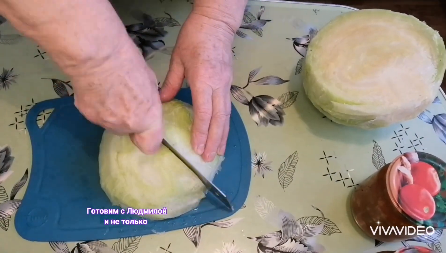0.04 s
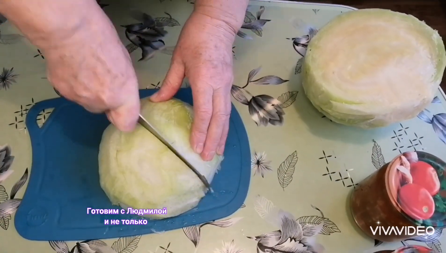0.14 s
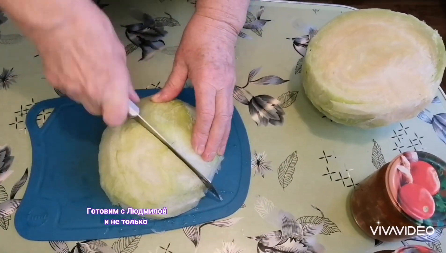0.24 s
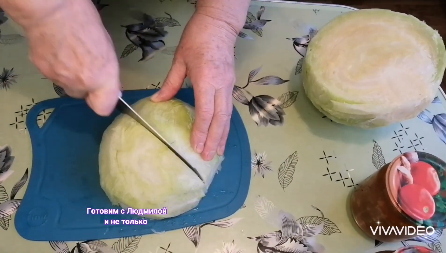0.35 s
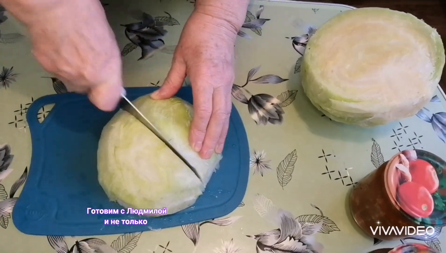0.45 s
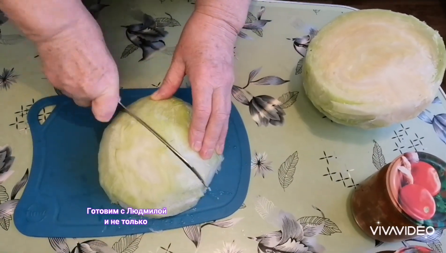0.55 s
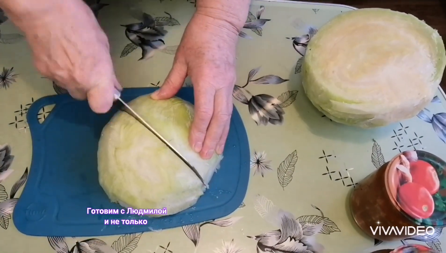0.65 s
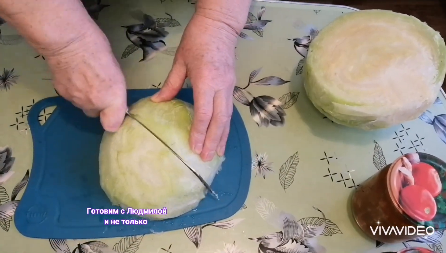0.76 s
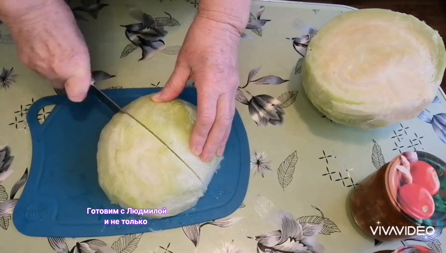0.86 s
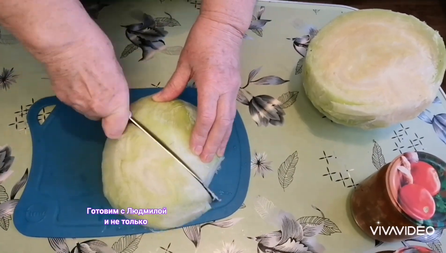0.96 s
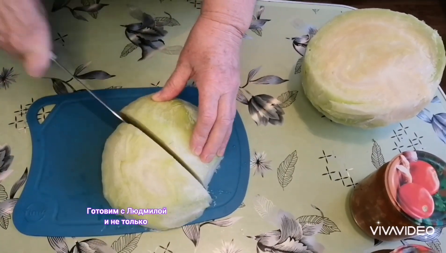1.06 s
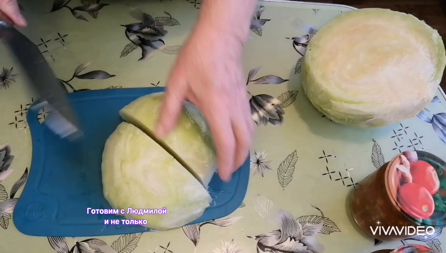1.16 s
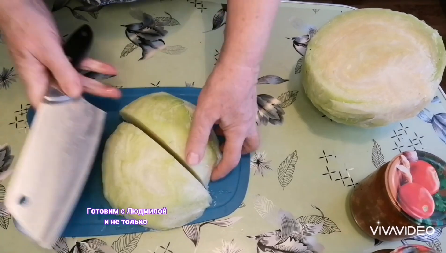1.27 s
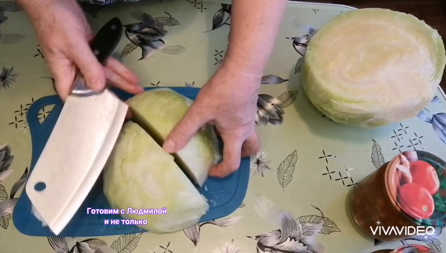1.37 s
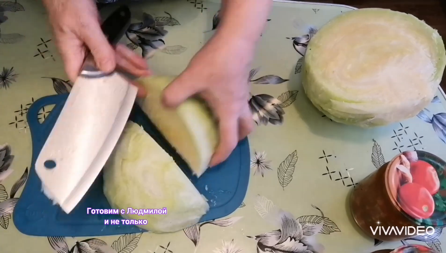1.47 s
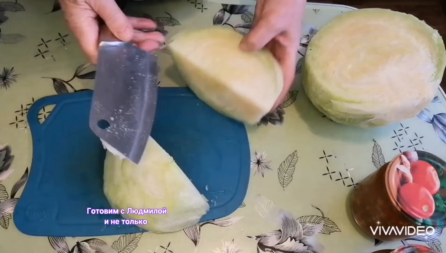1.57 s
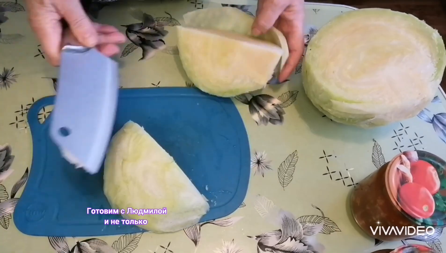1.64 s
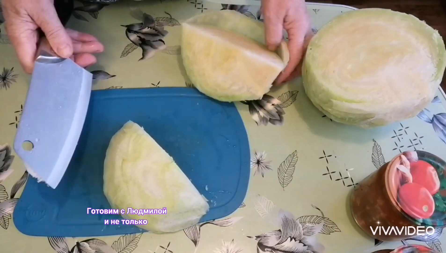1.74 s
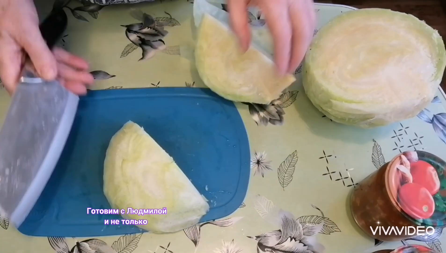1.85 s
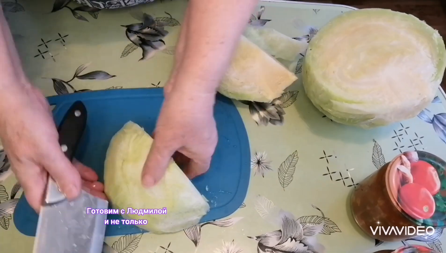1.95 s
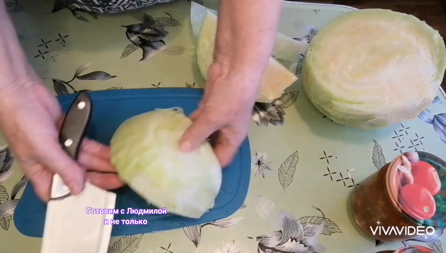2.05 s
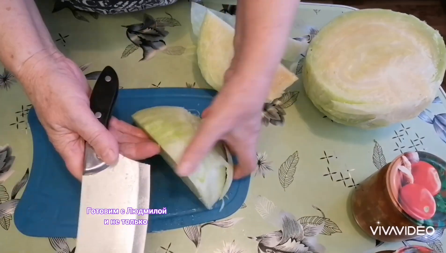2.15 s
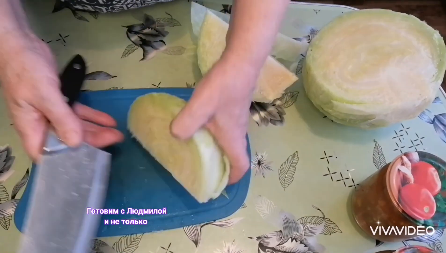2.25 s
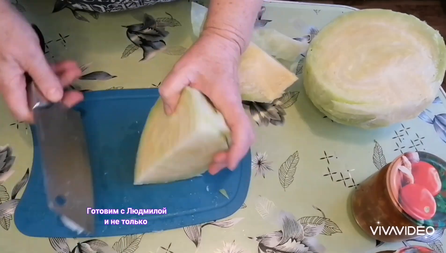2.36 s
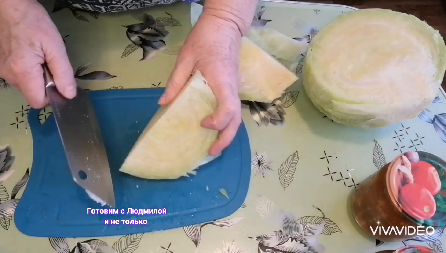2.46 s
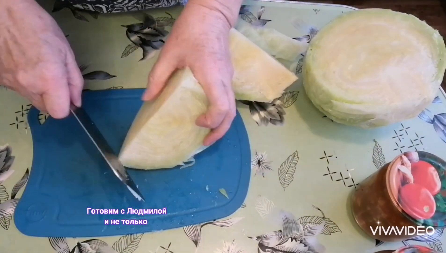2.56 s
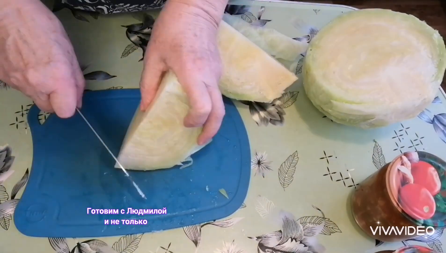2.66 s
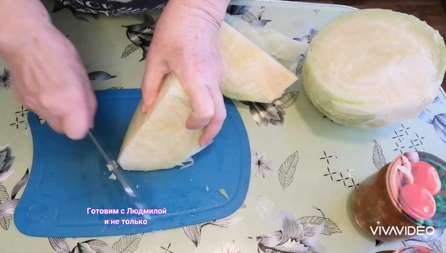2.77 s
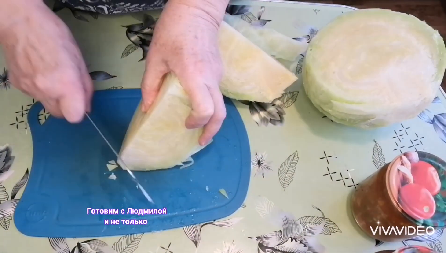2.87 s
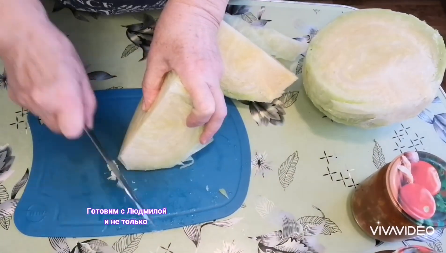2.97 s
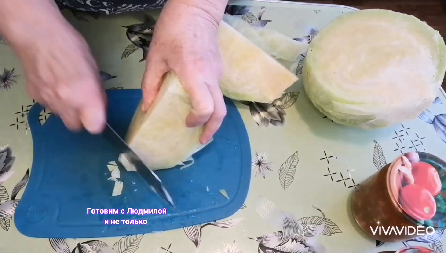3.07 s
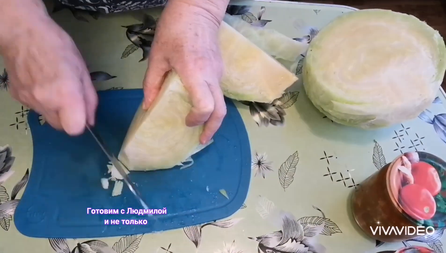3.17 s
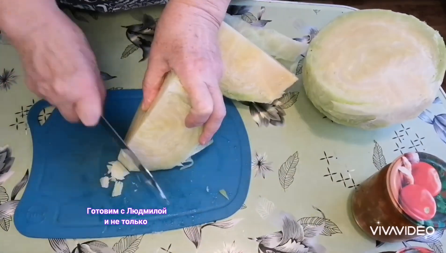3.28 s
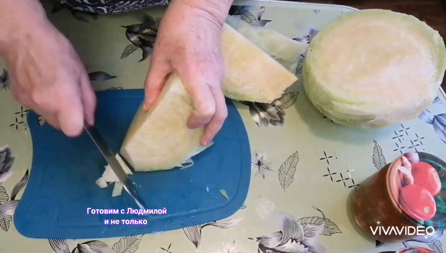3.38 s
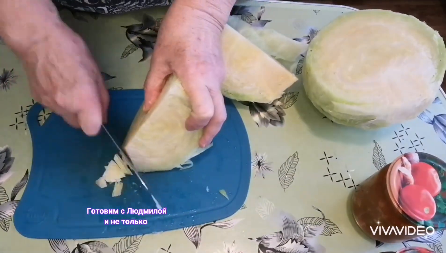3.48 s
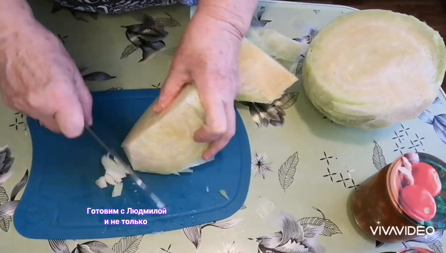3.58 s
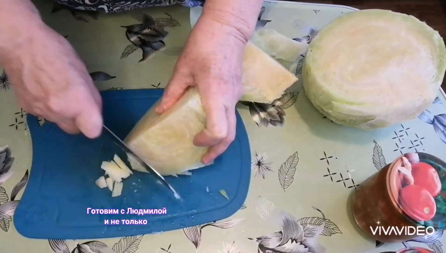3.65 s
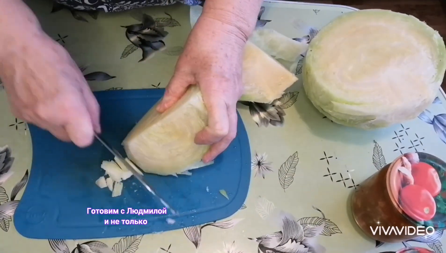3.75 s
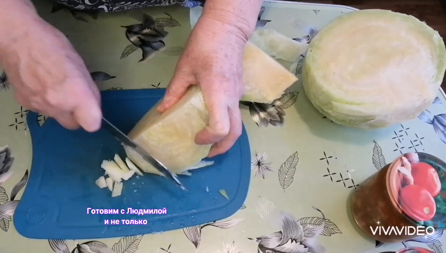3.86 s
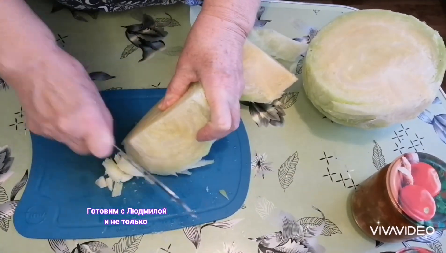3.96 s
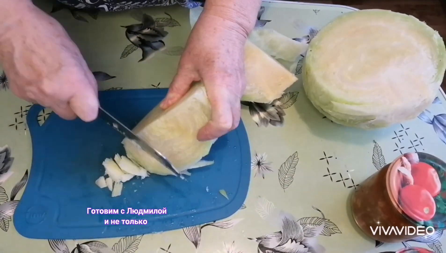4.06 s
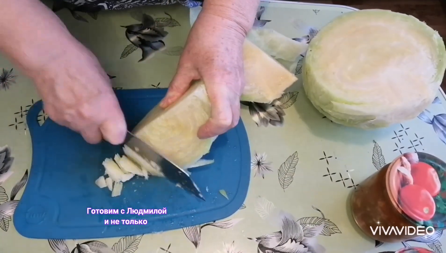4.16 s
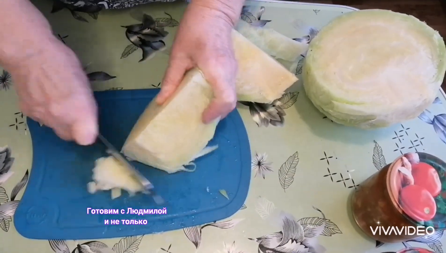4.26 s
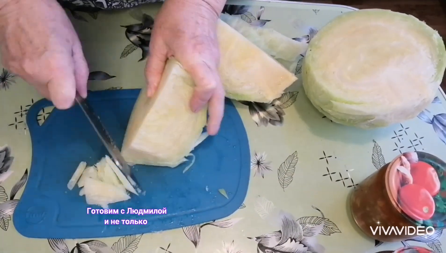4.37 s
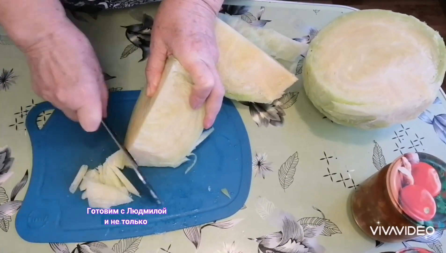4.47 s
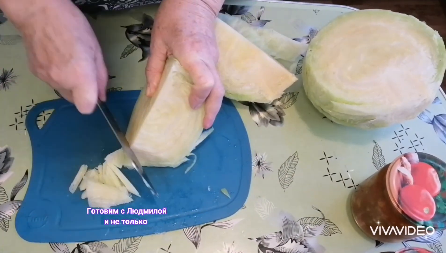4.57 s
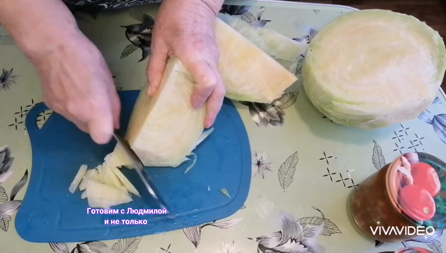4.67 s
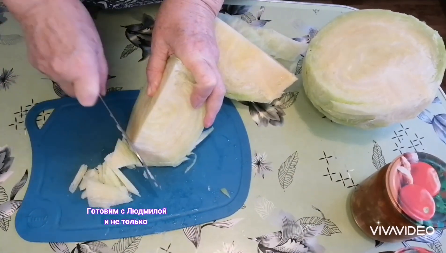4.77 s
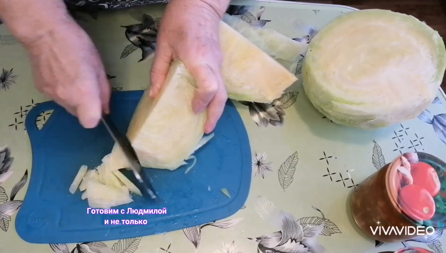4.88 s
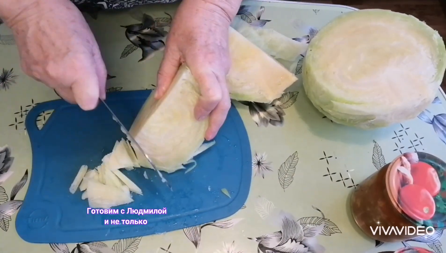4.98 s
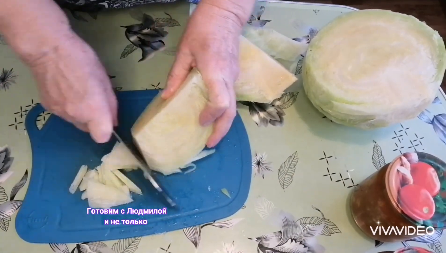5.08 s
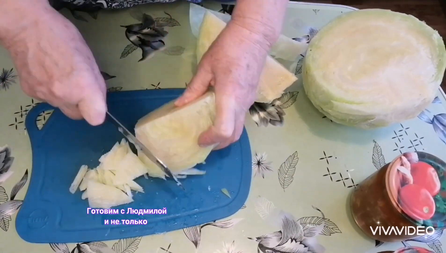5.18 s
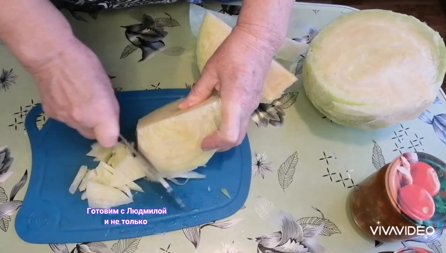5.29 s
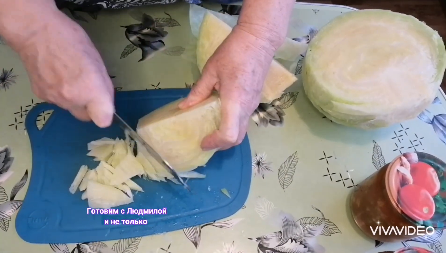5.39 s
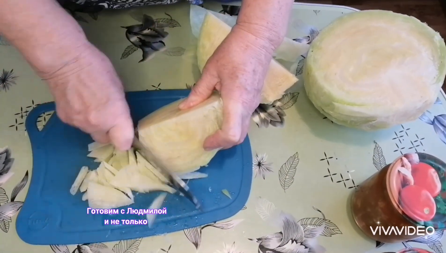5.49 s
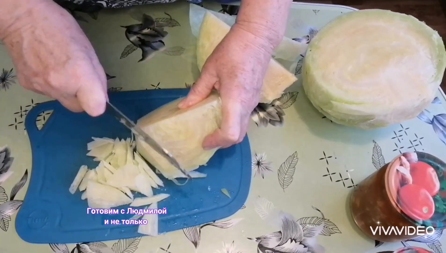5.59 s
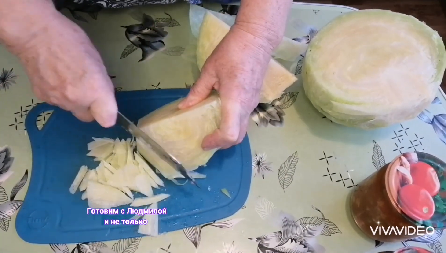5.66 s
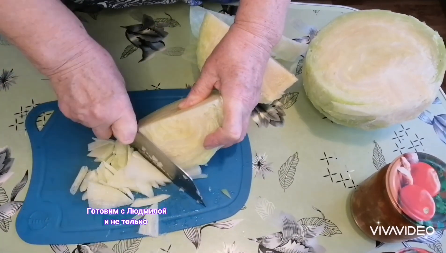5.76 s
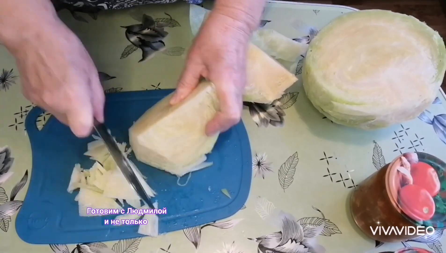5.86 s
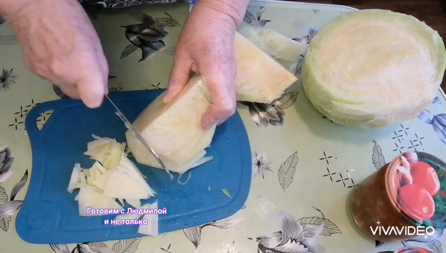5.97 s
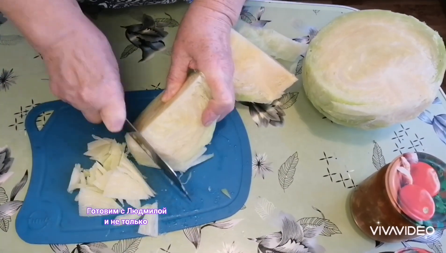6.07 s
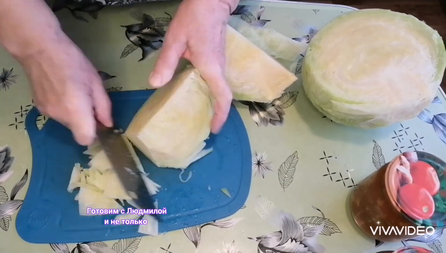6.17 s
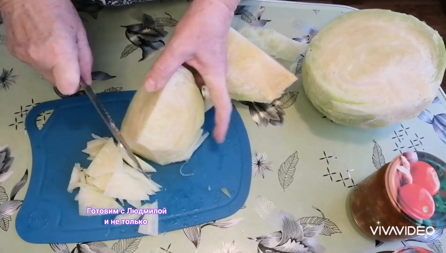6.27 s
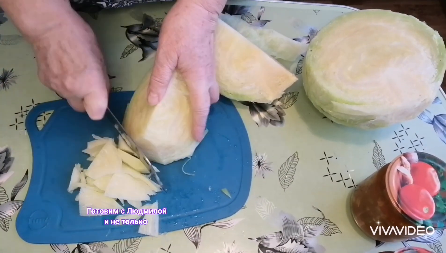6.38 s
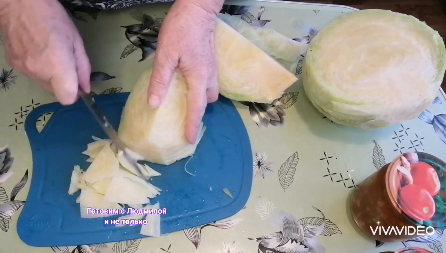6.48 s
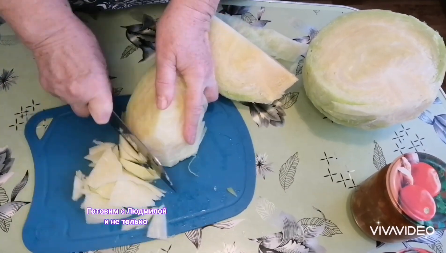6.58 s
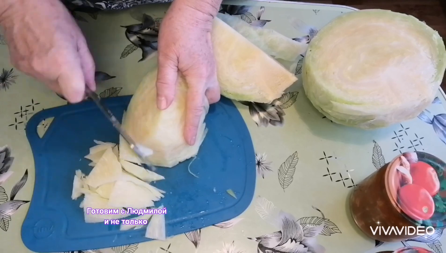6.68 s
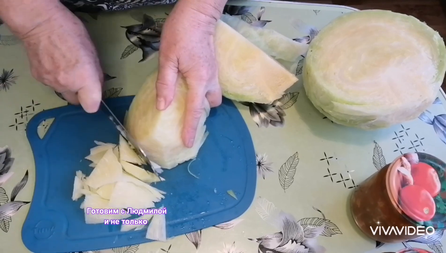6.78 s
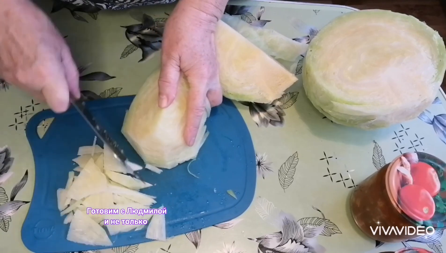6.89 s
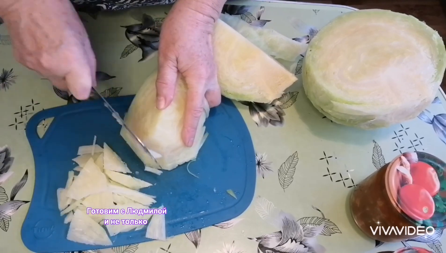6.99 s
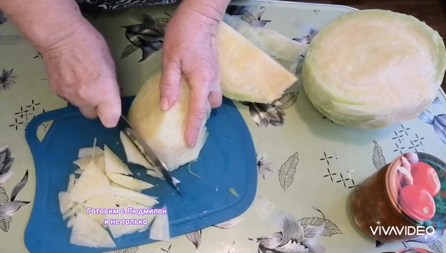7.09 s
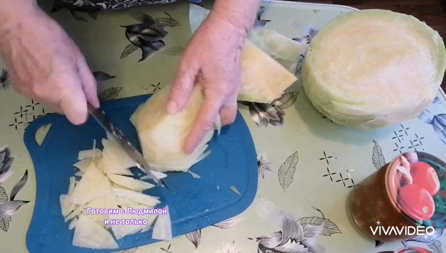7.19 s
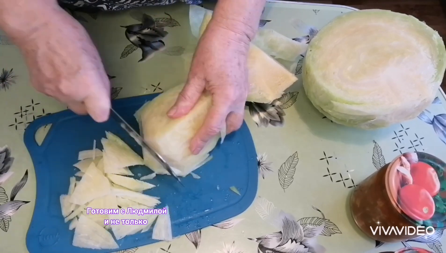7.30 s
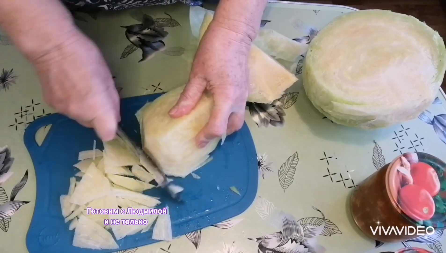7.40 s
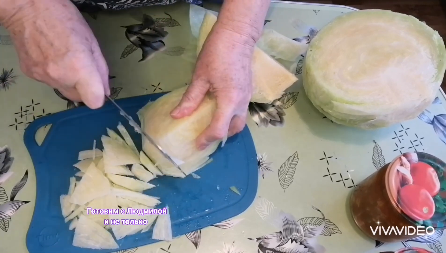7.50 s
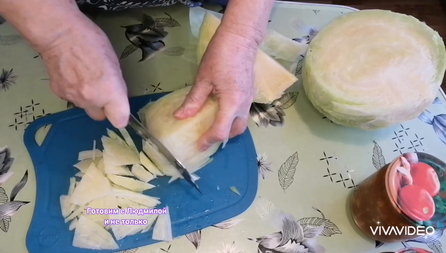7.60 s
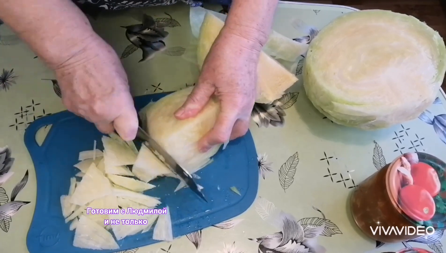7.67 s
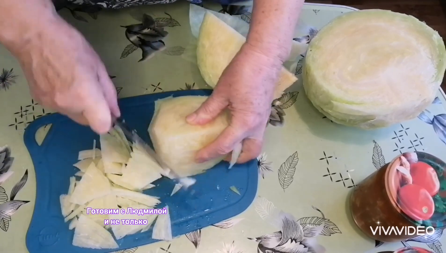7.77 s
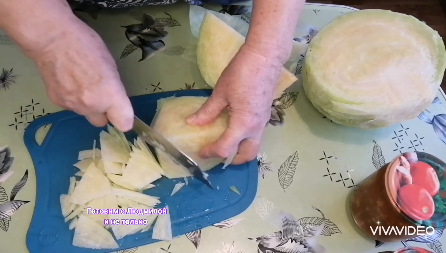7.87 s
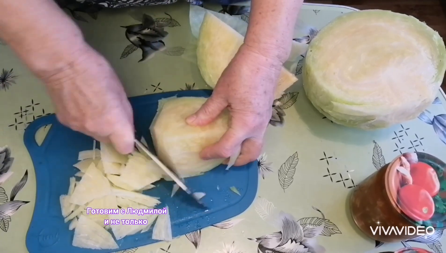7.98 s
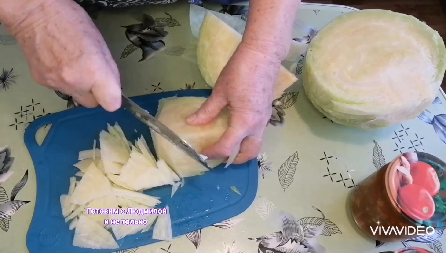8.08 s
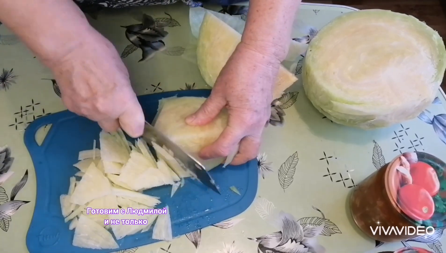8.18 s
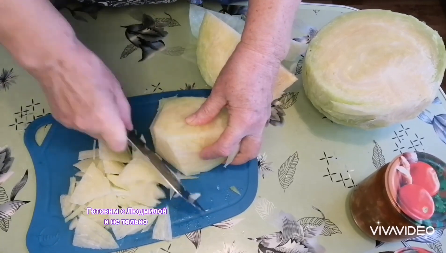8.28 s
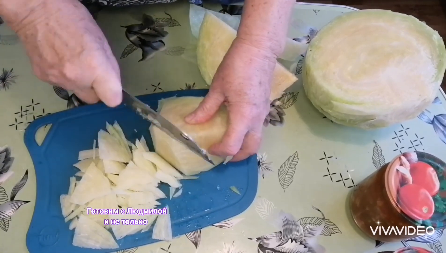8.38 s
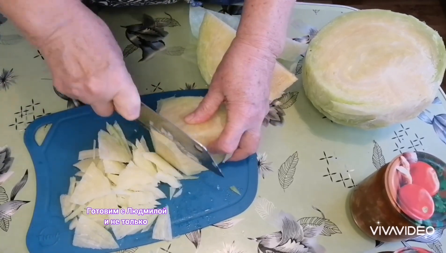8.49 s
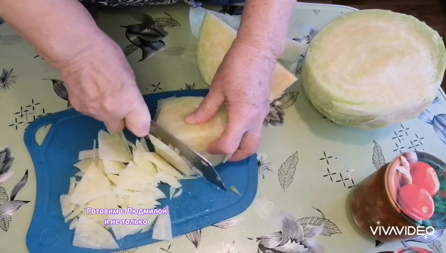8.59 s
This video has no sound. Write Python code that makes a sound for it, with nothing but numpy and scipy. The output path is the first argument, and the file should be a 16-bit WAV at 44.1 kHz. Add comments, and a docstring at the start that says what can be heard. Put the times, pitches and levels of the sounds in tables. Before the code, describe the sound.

A heavy blade crunches through a cabbage wedge with dull board knocks, then shreds it in crisp, even strokes, close up in a quiet kitchen.

```python
"""A cleaver halves a wedge of cabbage on a plastic board, then shreds it in even strokes, heard close by in a kitchen.
Each stroke is a stream of random cell bursts (crunch) over a low, rising noise (cabbage and board shaking).
It may end in a knock, a damped swing with ringing board modes; other shredding strokes end in a short drag.
Between cuts, decaying tones make soft thumps, short noise ticks make rib snaps and tiny slips make leaf rustles.
Short, dull reflections and a room noise that slowly rises and falls in level surround the work."""
import sys
import numpy as np
from scipy import signal
from scipy.fft import rfft, irfft
from scipy.io import wavfile
from scipy.ndimage import uniform_filter1d

SR = 44100
rng = np.random.default_rng(int(sys.argv[2]) if len(sys.argv) > 2 else 0)


def transcribe(u):
    """Save the signal u as a 16-bit wav file named by the first command-line argument.

    u: samples, shape (n,) or (channels, n), limited to [-1, 1]; the rate is SR.
    q: integer samples, one column per channel.
    """
    v = np.clip(np.atleast_2d(u).T, -1, 1)
    q = np.round(v * 32767).astype(np.int16)
    wavfile.write(sys.argv[1], SR, q)


N = 381024
TIME = np.arange(N) / SR

# pushes of the knife through the leaves:
# start_s, push_length_s, crunch_db, body_db, build_up_db, brightness_db
PUSHES = [(0.006, 0.1, -43.5, -41, 13, -2.0), (0.205, 0.056, -43.5, -41.5, 13.5, -3),
          (0.411, 0.077, -37, -35, 19.5, -3), (0.581, 0.12, -37.5, -33.5, 20.0, -1),
          (0.771, 0.084, -48.0, -53.5, 23, 0.5), (0.899, 0.045, -43, -54, 17, 1.5),
          (1.0, 0.041, -36.0, -40, 4.0, 0), (2.767, 0.078, -43.5, -45, 8.5, 7.5),
          (2.968, 0.026, -38, -33.5, 1.5, 6.0), (3.122, 0.066, -37.5, -32.5, 13.5, 3.0),
          (3.326, 0.063, -36.5, -27.5, 29, 1.0), (3.521, 0.099, -34, -30.5, 25, 2.5),
          (3.752, 0.038, -35.5, -37.5, 10, 2), (3.932, 0.081, -36, -34.5, 17.5, 1.5),
          (4.155, 0.12, -32, -28.5, 21, 2.5), (4.499, 0.028, -35.5, -30, 16, 6.5),
          (4.66, 0.052, -36, -31.0, 6.0, 3), (4.858, 0.053, -31.5, -27.5, 7, 1.5),
          (5.092, 0.058, -36, -33.5, 9, 1.5), (5.306, 0.052, -38, -35.5, 13.5, 5.5),
          (5.485, 0.083, -40.5, -36.5, 9.5, 2.5), (5.722, 0.13, -35.5, -32.5, 24, 2.0),
          (6.05, 0.14, -37.5, -30, 14, 2), (6.395, 0.061, -34, -30.5, 21.5, 4.0),
          (6.621, 0.058, -31, -28, 13.5, 2.0), (6.824, 0.03, -36.5, -42, 6, 10),
          (6.938, 0.013, -43, -51.5, 14.0, 1.5), (7.095, 0.09, -31.5, -27.5, 11, 3),
          (7.379, 0.063, -35, -34, 15.5, 6.0), (7.615, 0.13, -29.5, -28, 29.5, 3.0),
          (7.925, 0.097, -28, -24, 32.5, 3.0), (8.204, 0.13, -29.5, -23, 19.5, 3),
          (8.516, 0.11, -39.5, -29, 17, 4.0)]
# landings of the blade on the board, ring levels relative:
# time_s, thud_peak_db, thud_hz, chatter_length_s, low_ring_db, high_ring_db
LANDINGS = [(0.702, -8, 250, 0.022, -36, -40), (1.052, -9, 430, 0.023, -22, -21.5),
            (2.83, -13.5, 257, 0.017, -25.5, -28), (3.629, -10.5, 298, 0.0065, -30, -39),
            (3.792, -13, 265, 0.039, -23.5, -33), (4.284, -10.5, 310, 0.019, -22, -28.5),
            (4.921, -10, 313, 0.014, -28.5, -18.5), (5.561, -17, 254, 0.04, -24, -29.5),
            (5.868, -11.5, 305, 0.011, -25.5, -24.5), (6.685, -10.5, 293, 0.018, -26.5, -33.5),
            (7.197, -10.5, 328, 0.017, -25, -30.5), (8.036, -8.5, 360, 0.013, -27, -26.5),
            (8.338, -9, 308, 0.015, -17, -22.5)]
# spectrum of the crunch, with a sharp peak near 7 kHz: frequency_hz, relative_level_db_per_hz
CRUNCH_SPECTRUM = [(300, -2.5), (700, 2.5), (1400, -0.5), (2000, 1.5), (3000, 2), (4000, -6), (5200, -0.5),
                   (6300, -1.5), (7000, 3), (7700, 1), (9000, -4), (11000, -8), (15000, -11), (17000, -20)]
# correlation of left and right: frequency_hz, likeness (-1 to 1)
COHERENCE = [(100, 0.97), (280, 0.96), (500, 0.62), (1000, 0), (2200, 0.15), (5000, 0.13), (12000, 0.012)]
# release of a push: time to lose 20 dB, and the exponent that makes the fall ever faster
CRUNCH_FADE_S, CRUNCH_FADE_CURVE = 0.042, 1.29
BODY_FADE_S, BODY_FADE_CURVE = 0.0539, 1.38


def from_db(db):
    """Decibels are a logarithmic measure of amplitude ratio."""
    return 10 ** (np.asarray(db) / 20)


def rms_one(x):
    """Normalisation to unit root-mean-square amplitude."""
    return x / np.sqrt(np.mean(x ** 2) + 1e-20)


def at_hz(points, hz):
    """Interpolation of a spectrum along a logarithmic frequency axis."""
    points = np.array(points)
    return np.interp(np.log(hz + 1e-9), np.log(points[:, 0]), points[:, 1])


def band(x, hz, kind, order=2):
    """Linear filtering with a maximally flat passband."""
    sos = signal.butter(order, hz, kind, fs=SR, output="sos")
    return signal.sosfilt(sos, x + 1e-18)


def drift(t, per_s):
    """Slow random modulation: interpolated noise of rms 1."""
    return rms_one(np.interp(t * per_s, np.arange(len(t)), rng.standard_normal(len(t))))


def stereo_mix(mid, side, alike):
    """Interchannel coherence: shared and opposed parts of independent signals set the correlation."""
    return np.sqrt(1 + alike) * mid + np.array([[1], [-1]]) * np.sqrt(1 - alike) * side


def colour(pair, spectrum, shift=1, modes=()):
    """Spectral shaping: two independent excitations become a partly coherent stereo pair of rms 1."""
    # left minus right: frequency_hz, difference_db
    balance = [(120, 3.5), (280, -1), (600, 0.5), (1500, -0.5), (3000, 2), (5000, 2), (6800, 9.5),
               (8300, -5.5), (10000, -3), (12500, 3)]
    size = pair.shape[-1]
    hz = np.arange(size // 2 + 1) * SR / size
    level = at_hz(spectrum, hz / shift)
    for centre, width, db in modes:
        level = level + db / (1 + (2 * (hz - centre) / width) ** 2)
    alike = np.clip(at_hz(COHERENCE, hz), -1, 1)
    mid, side = rfft(pair)
    both = stereo_mix(mid, side, alike)
    tilt = np.array([[1], [-1]]) * at_hz(balance, hz) / 2
    return rms_one(irfft(both * from_db(level + tilt), size))


def fractures(per_s, size=N):
    """Brittle fracture as a random point process: most bursts are tiny and a few large."""
    born = rng.random(size) < per_s / SR
    sizes = from_db(1.5 * np.minimum(rng.exponential(1, size), 4))
    return born * sizes * rng.standard_normal((2, size))


def steady(x, span_s):
    """Power equalisation: the mean power is kept even while the fine grain stays."""
    power = uniform_filter1d(np.mean(x ** 2, axis=0), int(span_s * SR))
    return x / np.sqrt(np.abs(power) + 1e-9)


def swell(t, times, levels_db, attack_s, release_s):
    """Amplitude envelope of one gesture: it rises by 40 dB, follows its levels and falls by 40 dB."""
    knots = [times[0] - attack_s, *times, times[-1] + release_s]
    knots_db = [levels_db[0] - 40, *levels_db, levels_db[-1] - 40]
    first, last = np.searchsorted(t, [knots[0], knots[-1]])
    gain = np.zeros(len(t))
    gain[first:last] = from_db(np.interp(t[first:last], knots, knots_db))
    return gain


def rubbing(table, spectrum, per_s, fade_db, release_s):
    """Stick-slip friction: tiny random slips under a short contact, from fade_db above to below its level."""
    slips = steady(colour(fractures(per_s), spectrum), 0.077)
    contact = np.zeros(N)
    for s, length, db in table:
        contact += swell(TIME, [s, s + length], [db + fade_db, db - fade_db],
                         attack_s=0.0087, release_s=release_s)
    return slips * contact


def ring(clicks, hz, t60):
    """Damped resonance: a unit click sets a decaying sine of initial height 1 ringing."""
    radius = from_db(-60 / (t60 * SR))
    angle = 2 * np.pi * hz / SR
    feedback = [1, -2 * radius * np.cos(angle), radius * radius]
    return signal.lfilter([0, np.sin(angle)], feedback, clicks + 1e-18)


def add(out, s, sound):
    """Superposition of a sound at its onset."""
    at = int(s * SR)
    out[:, at:at + sound.shape[-1]] += sound[..., :N - at]


def room_air(floor_db=0.0):
    """Broadband noise with resonant peaks: a room noise that slowly rises and falls in level."""
    # noise spectrum: frequency_hz, relative_level_db_per_hz
    floor_spectrum = [(25, -3), (80, -7.5), (300, -8), (460, -13), (900, -7.5), (1300, -16.5), (2900, -15),
                      (4100, -21.5), (5400, -16.5), (6900, -15), (8000, -18), (9000, -18), (12500, -28),
                      (16000, -27.5)]
    # resonances in the noise: centre_hz, width_hz, boost_db
    air_modes = [(151, 24, 9.5), (266, 9.3, 17.5), (387, 67, 11.5), (534, 51, 6.5), (1550, 54, 9),
                 (2393, 52, 9.5)]
    # noise level: time_s, level_db
    ambience = [(0, -52.5), (1.1, -55.5), (2.5, -56.5), (4.2, -58.5), (5.5, -61.5), (6.6, -57), (7.4, -58),
                (8.6, -55.5)]
    noise = colour(rng.standard_normal((2, N)), floor_spectrum, modes=air_modes)
    return from_db(floor_db + np.interp(TIME, *np.transpose(ambience))) * noise


def patchy(x):
    """Convolution: a short random response, drawn anew each time, makes each crunch's spectrum patchy."""
    t = TIME[:SR // 100]
    response = rng.standard_normal((2, len(t))) * np.exp(-t / .0016)
    response /= np.sqrt(np.sum(response ** 2, axis=1, keepdims=True))
    return x + .55 * signal.fftconvolve(x, response, axes=1)[:, :x.shape[1]]


def push(t, length_s, build_db, fade_s, fade_curve):
    """Force envelope: the edge enters, pressure builds quickly then more slowly, and is let go ever faster."""
    entry = 3302 * np.minimum(t, 0)  # dB, at 3302 dB per s
    build = -build_db * np.clip(1 - t / length_s, 0, 1) ** 1.304
    fade = -20 * (np.maximum(t - length_s, 0) / fade_s) ** fade_curve
    return from_db(entry + build + fade)


def rest_time(start, length):
    """Contact timing: when the blade lies still after a push that knocks; infinite if it does not knock."""
    rests = (s + chatter for s, _, _, chatter, *_ in LANDINGS if start < s < start + length + .04)
    return min(rests, default=np.inf)


def cutting(crunch_db=0.0, body_db=0.0, split_hz=4500, glide_octaves=.5,
            cells_per_s=6500, layers_db=2.0, layers_per_s=110):
    """Fracture noise and forced vibration: cells crunch in layers while blade jerks shake cabbage and board."""
    # spectrum of the shaken cabbage and board before shifting: frequency_hz, relative_level_db_per_hz
    body_spectrum = [(25, -54.5), (70, -24), (110, -8.5), (170, 0.5), (235, 1), (290, -3.5), (380, -6.5),
                     (480, -18.5), (700, -21), (1200, -45), (3000, -68)]
    # the wedge is turned and held, changing its pitch: time_s, body_pitch_ratio
    wedge_pitch = [(0, 1.02), (3.2, 1.14), (3.7, 0.82), (4.4, 1.14), (4.8, 0.98), (7.1, 0.92), (8.3, 1.11)]
    body_build_share, stop_db_per_s = 0.77, 1506
    out, t = np.zeros((2, N)), TIME[:2 ** 14] - .008
    low_pass = signal.butter(2, split_hz, fs=SR, output="sos")
    for start, length, peak_db, shake_db, build_db, bright_db in PUSHES:
        cells = patchy(fractures(cells_per_s, size=len(t)))
        cells = steady(colour(cells, CRUNCH_SPECTRUM), .012)
        # brightness trades the dull part against the sharp part
        dull = signal.sosfiltfilt(low_pass, cells)
        cells = from_db(-.75 * bright_db) * dull + from_db(0.89 * bright_db) * (cells - dull)
        layers = from_db(layers_db * drift(t - t[0], layers_per_s))
        crunch = rms_one(cells) * layers
        crunch = crunch * push(t, length, build_db, CRUNCH_FADE_S, CRUNCH_FADE_CURVE)

        # less cabbage is left under the edge as it sinks, so the body rises in pitch
        depth = np.clip(t / (length + BODY_FADE_S / 2), 0, 1)
        reading_place = np.cumsum(2 ** (glide_octaves * (depth - .5)))
        pitch = np.interp(start, *np.transpose(wedge_pitch))
        jerks = colour(fractures(per_s=1500, size=len(t)), body_spectrum, shift=pitch)
        jerks = np.array([np.interp(reading_place, np.arange(len(t)), side) for side in jerks])
        jerks = steady(jerks, 0.0231)
        body = jerks * push(t, length, body_build_share * build_db, BODY_FADE_S, BODY_FADE_CURVE)

        # when the blade comes to rest on the board, the cutting stops short
        since_rest = np.maximum(start + t - rest_time(start, length), 0)
        moving = from_db(-stop_db_per_s * since_rest)
        stroke = from_db(crunch_db + peak_db) * crunch + from_db(body_db + shake_db) * body
        add(out, max(start + t[0], 0), moving * stroke)
    return out


def handling(thump_t60=0.12, upper_db=-7, snap_s=0.0016, snap_width=1.11):
    """Impulse response: cabbage bumps ring low and soft, snapping ribs give thin band-limited ticks."""
    # cabbage bumps the board: time_s, peak_db, lower_tone_hz
    thumps = [(0.019, -34, 89), (0.706, -20.5, 113), (1.709, -30, 116), (1.727, -42, 114),
              (1.904, -38, 121), (2.457, -33, 154), (2.477, -38, 170)]
    # single leaf ribs snap: time_s, peak_db, centre_hz
    snaps = [(0.338, -36, 7000), (.348, -35, 4730), (1.325, -39, 2580), (1.841, -30, 7740),
             (1.924, -38.5, 7000), (2.008, -28.5, 7600), (2.494, -35, 6000), (2.548, -27, 6300),
             (4.48, -37, 5000), (8.075, -33, 6950)]
    out, t = np.zeros((2, N)), TIME[:SR // 5]
    soft_blow = band(signal.unit_impulse(len(t)), 163, "low")
    for s, db, hz in thumps:
        bump = ring(soft_blow, hz, thump_t60)
        bump = bump + from_db(upper_db) * ring(soft_blow, hz * 1.47, thump_t60)
        add(out, s, from_db(db) * bump / np.abs(bump).max())
    for s, db, hz in snaps:
        burst = rng.standard_normal((2, len(t))) * np.exp(-t / snap_s)
        tick = band(burst, [hz / snap_width, hz * snap_width], "band", order=1)
        add(out, s, from_db(db) * tick / np.abs(tick).max())
    return out


def rustling():
    """Leaf friction: wet leaves rub in many tiny slips."""
    # leaf contacts: start_s, length_s, level_db
    rustles = [(0.335, 0.054, -55), (1.117, 0.066, -46), (1.395, 0.019, -56.5), (1.455, 0.011, -54.5),
               (1.706, 0.033, -50.5), (2.425, 0.065, -52.5), (2.542, 0.057, -52.5), (4.345, 0.032, -48),
               (4.47, 0.041, -50), (5.052, 0.017, -62), (6.715, 0.039, -62), (7.225, 0.052, -52),
               (7.5, 0.016, -51)]
    # spectrum of rubbing leaves: frequency_hz, relative_level_db_per_hz
    leaf_spectrum = [(300, -7), (1500, -8), (2600, -2), (4000, -3), (5400, 1.5), (6400, 0), (7000, 7),
                     (7700, 1.5), (9000, 1), (11500, -8.5), (16000, -13)]
    return rubbing(rustles, leaf_spectrum, per_s=7900, fade_db=0.0, release_s=0.048)


def knocks(thud_db=0.0, low_db=-3.0, high_db=-2.0, crack_db=-15, thud_width=1.32,
           chatter_fall_db=9, drop_db=7):
    """Impact and modal vibration: one damped swing of the board, then chatter on the table excites its modes."""
    # modes of the board on the table, before the later drop in level: frequency_hz, relative_level_db, t60_s
    board_modes = [(120, -15, 0.11), (249, -11.5, 0.1), (361, 0, 0.04), (486, -5, 0.033),
                   (660, -2.5, 0.047), (812, 1.5, 0.0076), (990, -2, 0.028), (1063, -6.5, 0.043),
                   (1360, -5, 0.019), (1733, -18.5, 0.03), (2050, -11, 0.01), (2700, -14, 0.064),
                   (3180, -15.5, 0.013), (4080, -28, .008)]
    out, t = np.zeros((2, N)), TIME[:SR // 6]
    blow = signal.unit_impulse(len(t))
    for s, peak_db, hz, length, low_ring_db, high_ring_db in LANDINGS:
        thud = -band(blow, [hz / thud_width, hz * thud_width], "band")
        touches = (rng.random(len(t)) < 900 / SR) * (t < length)
        touches = touches * from_db(-chatter_fall_db * t / length)
        low, high = np.zeros((2, 2, len(t)))
        for mode_hz, level_db, t60 in board_modes:
            mid, side = rng.standard_normal((2, len(t))) * (touches + 1.44 * blow)
            alike = np.clip(at_hz(COHERENCE, mode_hz), -1, 1)
            drive = stereo_mix(mid, side, alike)
            mode = from_db(level_db) * rms_one(ring(drive, mode_hz, t60))
            if mode_hz < 750:
                low += mode
            else:
                high += mode
        # the slow modes build up after the first swing
        low *= np.minimum(t / .006, 1) ** 2
        low = band(low, 97, "high")  # keep the low ring above about 97 Hz
        # the ring level drops by several dB within about 4 ms after the chatter
        dropped = from_db(-drop_db * np.clip((t - length) / 0.0043, 0, 1))
        low, high = low * dropped, high * dropped
        held = t < length + .004  # ring levels refer to this span
        sound = from_db(peak_db + thud_db) * thud / np.abs(thud).max()
        sound = sound + from_db(low_ring_db + low_db) * low / low[:, held].std()
        sound += from_db(high_ring_db + high_db) * high / high[:, held].std()
        crack = band(rng.standard_normal((2, len(t))), [900, 6000], "band", order=1)
        crack = crack * np.exp(-t / 0.00039)
        add(out, s, sound + from_db(peak_db + crack_db) * crack)
    return out


def tearing():
    """Tensile fracture: a thick leaf gives way in a brief dense run of cell bursts."""
    # leaves tear: start_s, length_s, mean_level_db
    tears = [(.945, .012, -43), (2.823, 0.013, -35), (3.173, 0.013, -37), (3.61, 0.012, -38),
             (4.018, 0.011, -38), (4.272, 0.01, -28.5), (4.718, 0.019, -32.5), (5.843, 0.029, -32.5),
             (6.043, 0.0093, -50), (6.16, .03, -41), (6.433, 0.015, -33.5), (6.852, 0.013, -40.5),
             (7.752, .014, -29), (7.969, 0.0073, -39.5)]
    return rubbing(tears, CRUNCH_SPECTRUM, per_s=5000, fade_db=1, release_s=0.011)


def dragging():
    """Sliding friction: the edge drags on the board, louder after a harder push; the wedge creaks before it splits."""
    # creaks of the wedge: start_s, length_s, mean_level_db
    creaks = [(0.966, 0.023, -37.5)]
    # friction spectrum: frequency_hz, relative_level_db_per_hz
    drag_spectrum = [(100, -4), (220, -2), (330, 8), (430, 9.5), (720, 5), (1050, 0), (1400, -9),
                     (2000, -15), (3200, -13), (4200, -30), (16000, -69)]
    shredding_from_s, lag_s, drag_s, drag_db = 2.6, 0.015, .035, -5.5
    slides = []
    for start, length, _, shake_db, *_ in PUSHES:
        # only a shredding stroke that does not knock ends in a drag
        if start > shredding_from_s and rest_time(start, length) == np.inf:
            slides.append((start + length + lag_s, drag_s, shake_db + drag_db))
    return rubbing(slides + creaks, drag_spectrum, per_s=4000, fade_db=4.0, release_s=0.034)


def squeaking():
    """Narrow-band friction: a wet leaf squeaks as the half is set down."""
    # squeaks: start_s, length_s, mean_level_db
    squeaks = [(1.71, 0.032, -39.5)]
    # narrow spectrum: frequency_hz, relative_level_db_per_hz
    squeak_spectrum = [(5800, -39), (7000, -3), (8400, -28)]
    return rubbing(squeaks, squeak_spectrum, per_s=3000, fade_db=5.0, release_s=0.024)


def kitchen(x, hold_s=0.033):
    """Reverberation: dense, dull reflections from cupboards and walls hold briefly, then die fast."""
    t60_s, room_db, top_hz = 0.081, -14.5, 3200
    t = TIME[:SR // 3]
    echoes = band(rng.standard_normal((2, len(t))), [550, top_hz], "band", order=1)
    decay = from_db(-60 * np.maximum(t - hold_s, 0) / t60_s) * (t > .005)
    response = echoes * decay / np.sqrt(np.sum(decay ** 2))
    return from_db(room_db) * signal.fftconvolve(x, response, axes=1)[:, :N]


def scene(cut_room_db=-6):
    """Superposition of direct and reflected sound: cuts excite the room less than knocks do."""
    # where the cutting is heard: time_s, left_minus_right_db
    cutting_place = [(0, -1.5), (3.3, 1), (4.5, -0.5), (5.3, 2.5), (5.65, 2.5), (6.4, 3), (7.3, 1.5),
                     (8.3, -0.5)]
    pan = from_db(np.interp(TIME, *np.transpose(cutting_place)) * [[.5], [-.5]])
    cuts = pan * (cutting() + tearing() + dragging())
    cuts = cuts + rustling() + squeaking() + handling()
    blows = pan * knocks()
    return cuts + blows + kitchen(from_db(cut_room_db) * cuts + blows) + room_air()


def record(dry):
    """Low-pass filtering: an elliptic filter cuts the top steeply above 15.4 kHz."""
    return signal.sosfilt(signal.ellip(10, .2, 80, 15400, fs=SR, output="sos"), dry)


dry = scene()
out = record(dry)
transcribe(out)
```